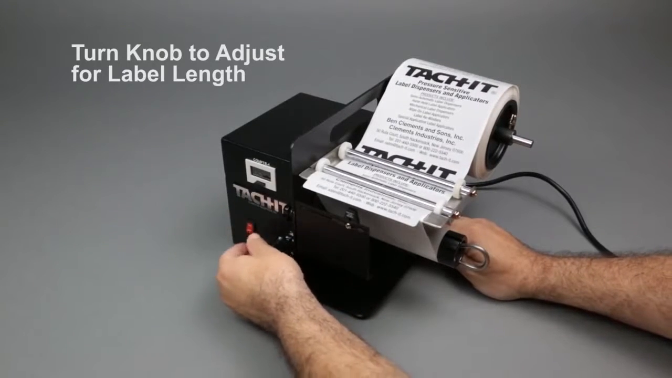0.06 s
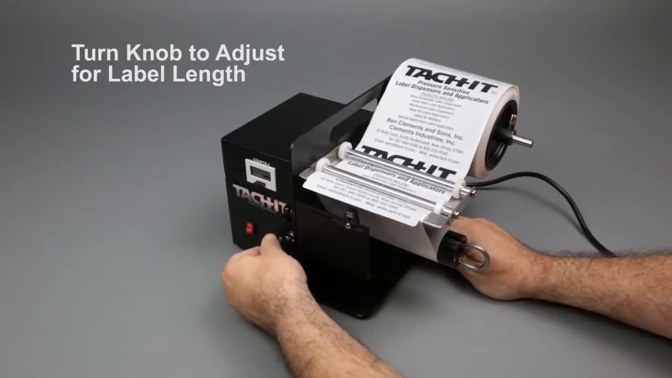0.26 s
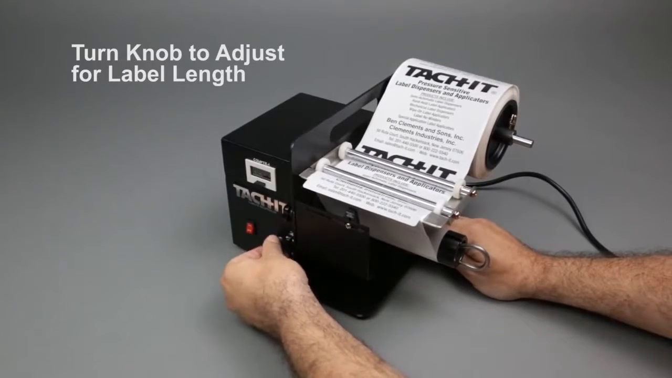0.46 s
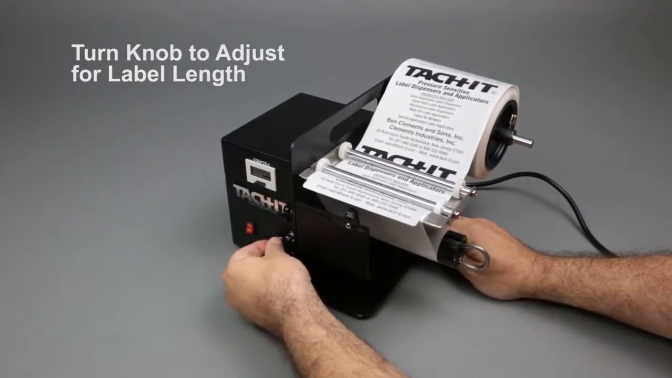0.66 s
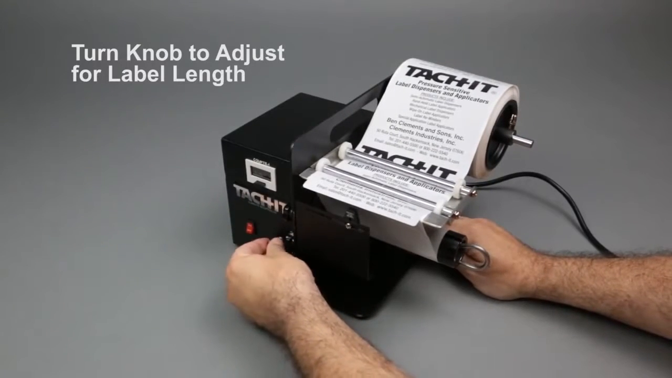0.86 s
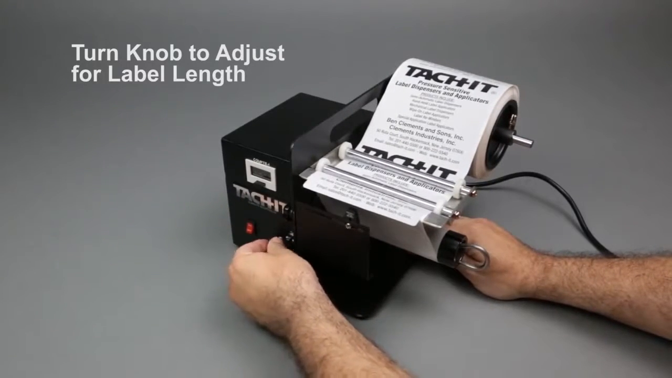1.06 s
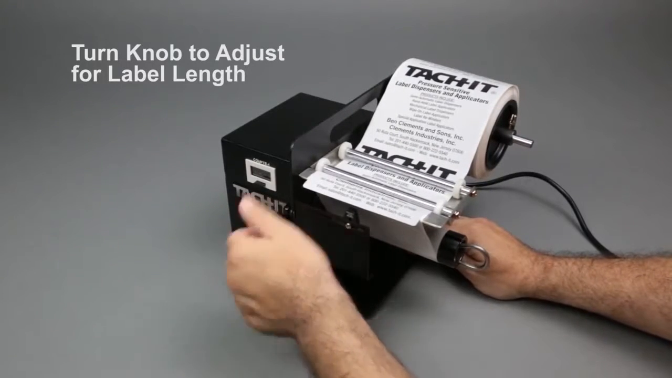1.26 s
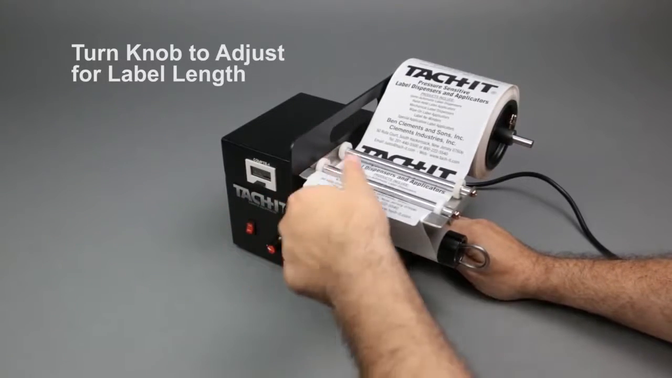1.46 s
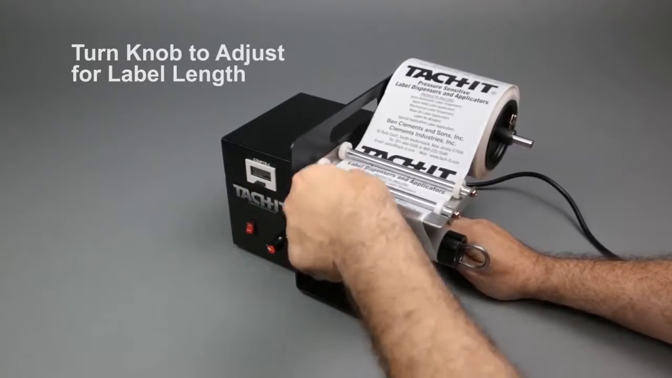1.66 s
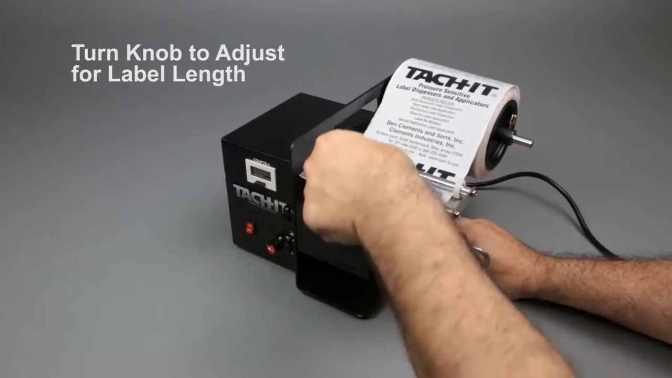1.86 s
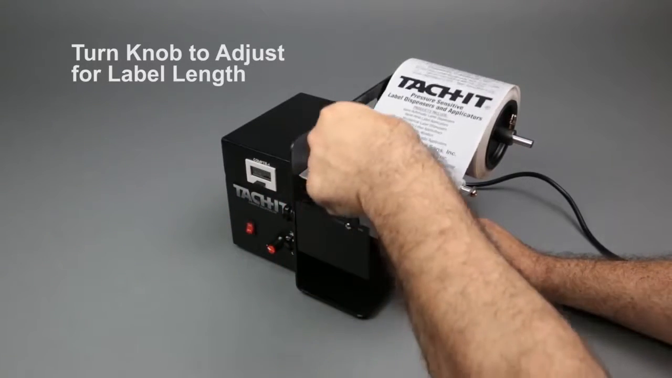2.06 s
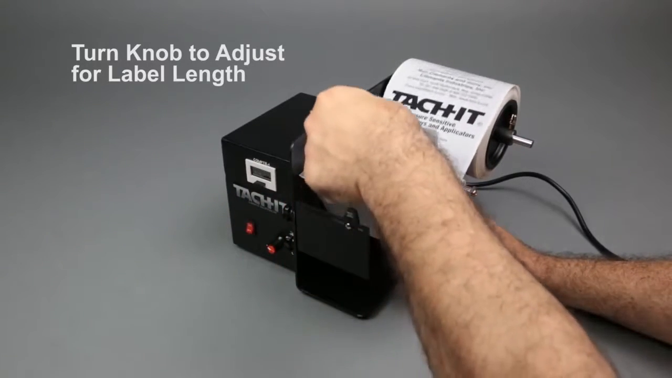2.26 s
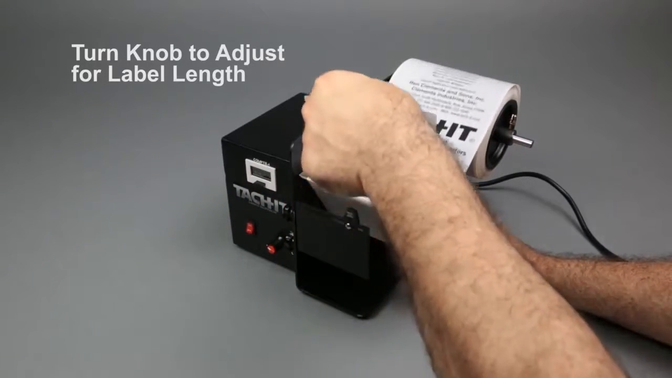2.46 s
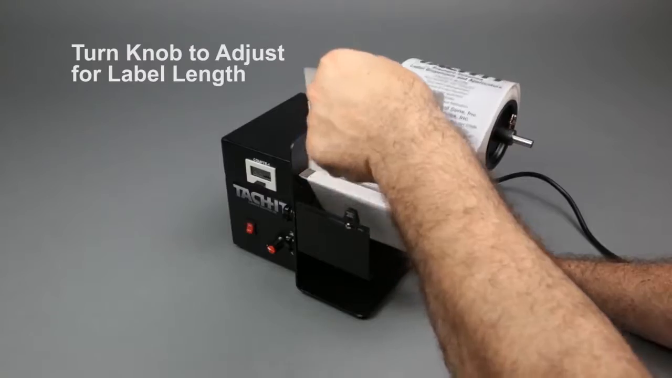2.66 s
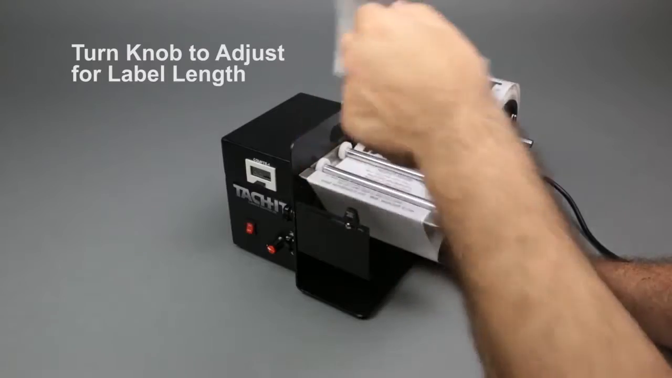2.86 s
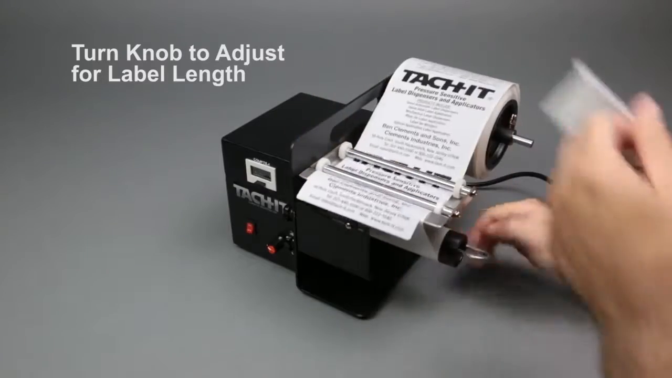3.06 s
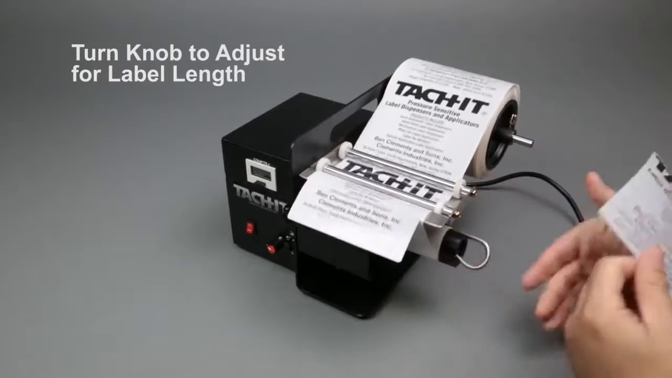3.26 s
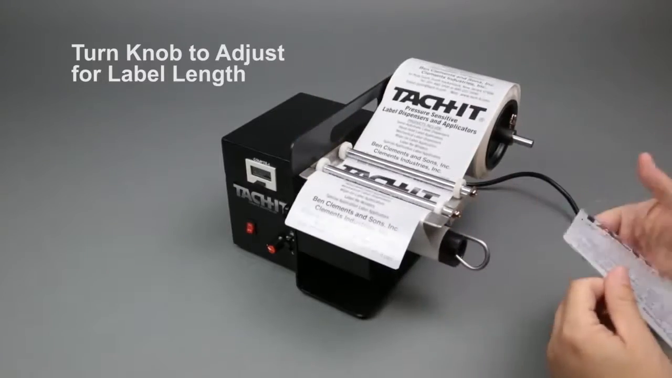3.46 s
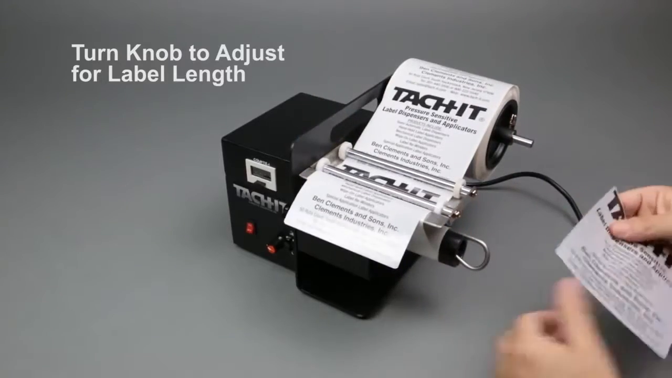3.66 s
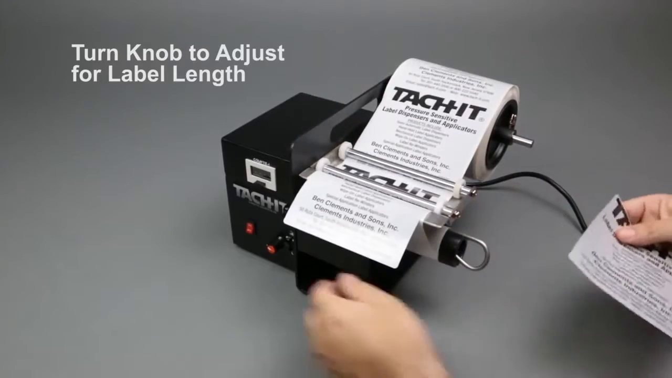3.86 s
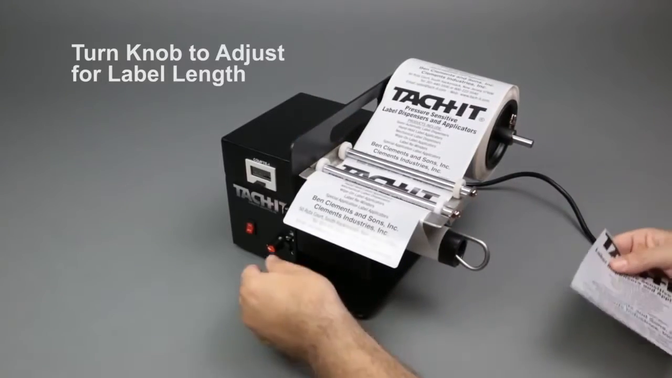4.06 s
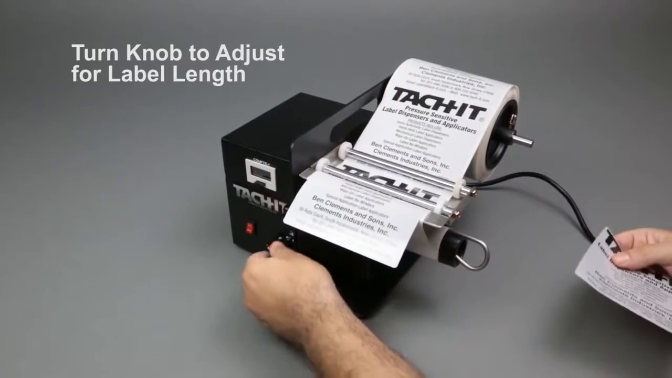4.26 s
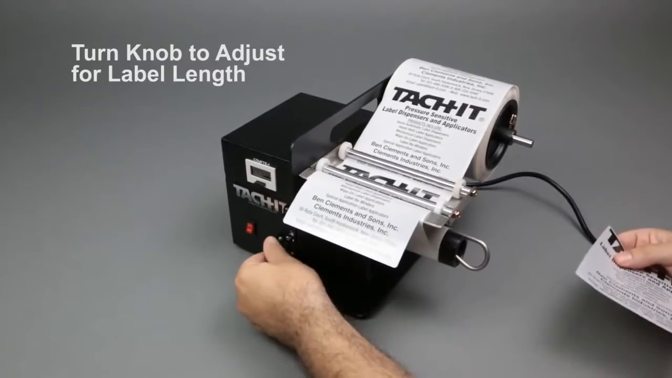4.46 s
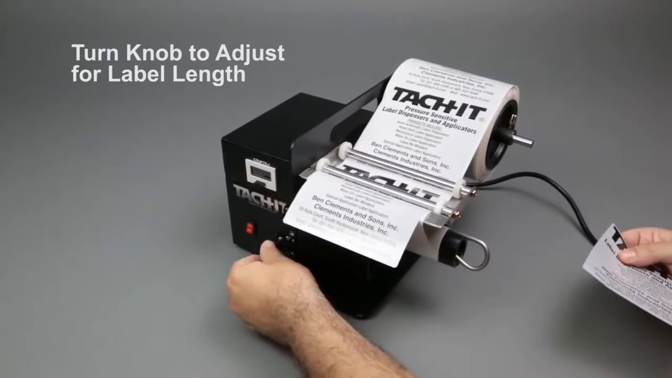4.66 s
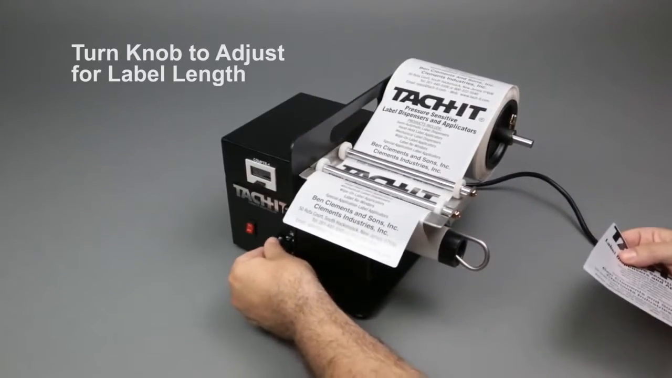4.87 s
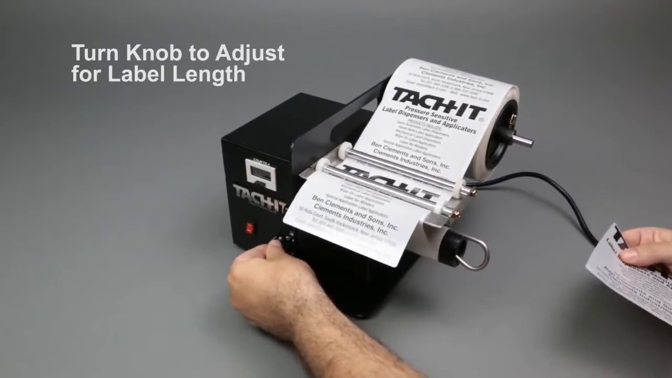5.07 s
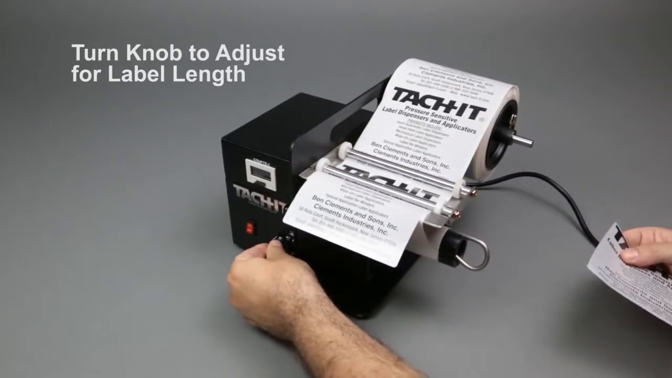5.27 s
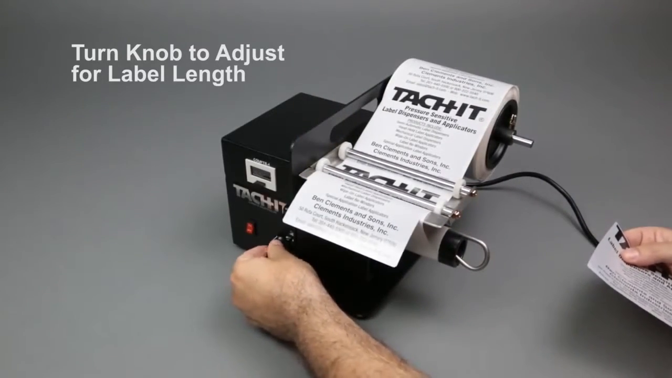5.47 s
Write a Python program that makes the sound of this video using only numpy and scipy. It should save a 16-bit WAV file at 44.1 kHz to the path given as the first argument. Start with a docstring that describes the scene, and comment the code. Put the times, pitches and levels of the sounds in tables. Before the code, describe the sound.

A small electric label dispenser is heard close up in a small quiet room, over a low steady rush of ventilation. At about 0.2 seconds a knob ticks lightly, with faint knocks from the metal housing. Around 1.5 seconds fingers brush very softly over paper. At 1.9 seconds a few clicks start the geared motor, which whirs and chatters while a label peels off its backing with a bright, sticky crackle. The peeling fades away between 2.8 and 3 seconds as the motor keeps running with a little more hum. The lifted label flips with a soft puff just after 3 seconds, and a sharp click comes at 3.2. At 3.4 seconds the motor brakes with a low knock and quickly winds down. The loose label crinkles twice around 3.7 seconds. Then only room air remains, with a light knob tick at about 5.1 seconds.

```python
"""Electric label dispenser, one feed

On a table in a small quiet room, close to the microphone, over a low rush of ventilation.
A knob ticks, fingers brush a label, and the geared mains motor feeds it, crackling off its backing,
until a hand lifts it away and it flips over with a puff. The motor brakes with a knock of the housing,
the loose label buckles twice, and the knob ticks again."""
import sys
import numpy as np
from scipy import signal
from scipy.fft import rfft, irfft, next_fast_len
from scipy.io import wavfile
from scipy.ndimage import uniform_filter1d

SR = 44100
rng = np.random.default_rng(int(sys.argv[2]) if len(sys.argv) > 2 else 0)


def unload_audio(sound):
    """Save the sound as a 16-bit wav file, at the path given as the first command line argument."""
    columns = np.transpose(np.atleast_2d(sound))
    # keep every value between -1 and 1, then stretch to whole-number steps
    steps = np.round(np.clip(columns, -1, 1) * 32767)
    wavfile.write(sys.argv[1], SR, steps.astype(np.int16))


N = 243873
TIME = np.arange(N) / SR

# gear teeth heard through the housing: frequency_hz, relative_db
GEAR_SPECTRUM = [(25, -52), (150, -27), (200, -2), (260, -7.5), (320, 0.5), (420, -2), (490, -6.5),
                 (620, -4.5), (850, -2.5), (1050, -8), (1250, -8), (1500, -7.5), (2200, -16.5), (4000, -28)]
# resonances of the steel housing: pitch_hz, width_hz, lift_db
HOUSING_RESONANCES = [(290.7, 11.2, 14), (406.6, 45, 8.5), (673, 36, 6), (854, 37, 3.5), (1360, 95, 3)]
# chatter of loose teeth and rollers: frequency_hz, relative_db
CHATTER_SPECTRUM = [(800, -13.5), (1500, -13), (2200, -7), (2700, -1.5), (3400, -3.5), (4300, -1.5),
                    (5500, -6), (6500, -8), (7700, -10.5), (8500, -17.5), (11000, -18.5), (12600, -24),
                    (15500, -30)]
# resonances of the gearbox and rollers: pitch_hz, width_hz, lift_db
ROLLER_RESONANCES = [(2590, 160, 4.5), (3220, 120, 4.5), (3730, 32, 0), (3724, 230, 10), (4240, 130, 0.5),
                     (4970, 140, 8.5), (6040, 140, 6.5), (6600, 90, 7.5), (7700, 150, 4), (9040, 250, 7)]
# the drive surges as the label is tugged and the backing springs slack:
# centre_s, length_s, gear_lift_db, hum_lift_db, chatter_lift_db
DRIVE_SURGES = [(2.272, 0.055, 1, 15, -2), (2.759, 0.048, 5, 7, 6), (3.08, .15, 0.5, 3.5, 3)]
# crackle of glue letting go: frequency_hz, relative_db
PEEL_SPECTRUM = [(40, -40), (300, -14), (800, -10), (1200, -11), (1650, -7.5), (2000, -1), (2500, -8),
                 (3200, -1), (4300, -1), (5500, 1), (7000, -1.5), (8300, -9), (11000, -13), (15500, -27)]
# resonances of the stripping plate: pitch_hz, width_hz, lift_db
PLATE_RESONANCES = [(1410, 110, 4.5), (3190, 150, 4), (4030, 27, 6), (4100, 25, -3), (4470, 200, 2),
                    (5060, 120, 5), (5500, 45, 3), (6200, 65, 2), (6820, 150, 3)]
# jolts of the housing: start_s, level_db, pitch_factor, rise_s, decay_factor
HOUSING_JOLTS = [(0.2335, -41, 1.004, .001, 0.78), (.279, -42, 1.01, 0.0037, 0.58),
                 (1.906, -44, 0.93, .003, 0.76), (3.385, -36, 1.04, 0.0033, 0.77),
                 (3.392, -29, 0.92, 0.0031, 0.47)]
# modes of the housing, scaled by each jolt: pitch_hz, relative_db, t60_s
HOUSING_MODES = [(390, -28, 0.081), (408.3, 0.5, 0.18), (443, -11, 0.16), (720, -27, .05),
                 (1165, -17.5, 0.12), (1500, -24, 0.17), (3590, -23.5, 0.16)]
# ticks of knob, switch and rollers: start_s, peak_db, pitch_hz, width_hz, t60_s
PART_TICKS = [(0.1556, -44.5, 3100, 3000, .008), (.188, -49, 3300, 3000, 0.011),
              (1.507, -61.5, 1670, 160, .25), (1.535, -54, 6000, 1800, .04), (1.66, -54, 3580, 1800, 0.04),
              (1.906, -42, 8600, 4500, 0.044), (1.921, -41, 8000, 4000, .04),
              (1.976, -29.5, 2170, 3500, 0.091), (3.2463, -27, 2300, 6010, 0.058),
              (5.145, -44.5, 3967, 1000, 0.032), (5.2, -55.5, 2700, 1400, .012)]
# ring of the loose label: frequency_hz, relative_db
LABEL_SPECTRUM = [(100, -37), (230, -13.5), (520, -6), (700, -9), (1070, -3.5), (1550, -10), (2100, -1),
                  (2700, -5.5), (3400, -8.5), (4800, -12.5), (6500, -21), (7400, -17), (9000, -31.5),
                  (12000, -38), (15000, -54)]
# the label buckles and springs back: start_s, level_db, shiver_s, tilt_db_per_octave
LABEL_BUCKLES = [(3.654, -44, .028, -3), (3.733, -45, 0.015, -1.5)]
# the sharpest creases snapping through: start_s, level_db, t60_s, tilt_db_per_octave
CREASE_SNAPS = [(3.6545, -34.5, 0.035, -0.5), (3.6646, -36.5, 0.022, -0.5), (3.674, -35, 0.031, -0.5),
                (3.726, -50.5, .04, 13), (3.7345, -39.5, 0.028, -1), (3.7376, -34, 0.0062, 7.5),
                (3.7495, -41, .03, 1.5)]
# fingers sliding on paper: centre_s, length_s, level_db
FINGER_STROKES = [(1.534, 0.025, -63.5), (1.731, 0.048, -65), (1.873, 0.092, -65.5)]
# steady air in the room: frequency_hz, relative_db
AIR_SPECTRUM = [(20, -21), (55, -10), (87, -6.5), (120, -3), (150, -7.5), (190, 0), (300, -5), (400, -10),
                (850, -15), (1300, -20.5), (2400, -25.5), (4000, -31), (8000, -35.5), (15500, -42)]
# self-noise of each input channel: frequency_hz, relative_db
HISS_SPECTRUM = [(12, -29), (20, 5), (112, -3), (252, -12.5), (452, -7.5), (1630, -10), (15500, -5.5)]

# one feed: the motor spins up, runs, and slows to rest after the brake
START_S, SPIN_UP_S, BRAKE_S, COAST_S = 1.903, 0.03, 3.382, 0.12
# the label peels at full width, then narrows to its last corner as the hand lifts it away
PEEL_S, PEEL_RISE_S, LIFT_S, FREE_S, LET_GO_S = 1.918, 0.034, 2.78, 2.92, 0.048
# the backing draws taut, and gears and peeling grow louder
TAUT_S, TAUT_RISE_S = 2.04, 0.036
GEAR_DB, TAUT_GEAR_DB, PEEL_DB, TAUT_PEEL_DB = -50, 3, -42, 1.5
# the drive roller runs out of round and loads the gears once a turn
TURN_HZ, HEAVIEST_S, TURN_DB = 6.86, 2.245, 1.5
# loose teeth and rollers chatter less while the label drags on them
CHATTER_DB, DAMPED_CHATTER_DB = -45.5, -4
# the stator hum, and how it grows from the moment the label is lifted
HUM_HZ, HUM_DB, LIFTED_HUM_DB, HUM_RISE_S = 120, -68, 8, 0.04


def motor(torque_ripple=0.11, wobble_db=1.36):
    """Gear teeth knock and chatter, harder at each torque pulse of the mains; the stator hums."""
    phase = 2 * np.pi * HUM_HZ * TIME
    torque = (1 + torque_ripple * np.cos(phase)) * undb(wobble_db * wander(35))
    tooth_hits = impacts(per_s=1800, scatter_db=2.5) * torque
    gears = unit(colour(tooth_hits, GEAR_SPECTRUM, HOUSING_RESONANCES))
    loose_hits = impacts(per_s=7000, scatter_db=1.5) * torque
    chatter = unit(colour(loose_hits, CHATTER_SPECTRUM, ROLLER_RESONANCES))
    hum = np.sqrt(2) * np.sin(phase) * undb(3.2 * wander(22.03))
    tension = adhesion() * ramp(TAUT_S, TAUT_RISE_S)
    roller_load = np.cos(2 * np.pi * TURN_HZ * (TIME - HEAVIEST_S))
    gear_db = GEAR_DB + TAUT_GEAR_DB * tension + TURN_DB * roller_load
    chatter_db = CHATTER_DB + DAMPED_CHATTER_DB * adhesion()
    hum_db = HUM_DB + LIFTED_HUM_DB * ramp(LIFT_S, HUM_RISE_S)
    for centre_s, length_s, gear_lift_db, hum_lift_db, chatter_lift_db in DRIVE_SURGES:
        surge = swell(centre_s, length_s)
        gear_db += gear_lift_db * surge
        hum_db += hum_lift_db * surge
        chatter_db += chatter_lift_db * surge
    return running() * (gears * undb(gear_db) + chatter * undb(chatter_db) + hum * undb(hum_db))


def running():
    """Gain of the drive: spin up, hold, then fall with the square of its speed."""
    return ramp(START_S, SPIN_UP_S) * (1 - ramp(BRAKE_S, COAST_S)) ** 2


def peeling(grip_db=0.7, contact_shift=0.23):
    """Threads of glue snap by the thousand as the backing bends over the stripping plate."""
    snaps = impacts(per_s=9000, scatter_db=2.5) * undb(grip_db * wander(60))
    # the line of contact wanders, so each resonance of the plate is driven now more, now less
    shifting = sum(wander(32) * resonate(snaps, hz, 3 * width_hz) for hz, width_hz, _ in PLATE_RESONANCES)
    crackle = unit(colour(snaps + contact_shift * shifting, PEEL_SPECTRUM, PLATE_RESONANCES))
    return crackle * undb(PEEL_DB + TAUT_PEEL_DB * ramp(TAUT_S, TAUT_RISE_S)) * adhesion()


def adhesion(narrowing_db_per_s=26):
    """Share of the label's width that is being pulled off the backing."""
    narrowing = undb(-narrowing_db_per_s * np.maximum(TIME - LIFT_S, 0))
    return ramp(PEEL_S, PEEL_RISE_S) * narrowing * (1 - ramp(FREE_S, LET_GO_S))


def knocks():
    """The housing rings low when the knob is turned and when the motor starts and brakes."""
    out = np.zeros(N)
    for start_s, level_db, pitch_factor, rise_s, decay_factor in HOUSING_JOLTS:
        for hz, mode_db, t60_s in HOUSING_MODES:
            decay = fade(t60_s * decay_factor)
            age_s = TIME[:len(decay)]
            attack = 1 - np.exp(-age_s / rise_s)
            tone = np.sin(2 * np.pi * hz * pitch_factor * age_s)
            add(out, start_s, undb(level_db + mode_db) * decay * attack * tone)
    return out


def ticks(rattle=0.36):
    """A hard contact and a short rattle excite one resonance of a small part."""
    out = np.zeros(N)
    for start_s, peak_db, hz, width_hz, t60_s in PART_TICKS:
        decay = fade(t60_s)
        push = rattle * decay * rng.standard_normal(len(decay))
        push[0] = 2  # the hard contact
        tick = resonate(resonate(push, hz, width_hz), hz, width_hz)
        add(out, start_s, undb(peak_db) * tick / np.abs(tick).max())
    return out


def buckling(give_s=0.0054, t60_s=0.083):
    """The loose label gives way, shivers while it folds through, and settles."""
    out = np.zeros(N)
    for start_s, level_db, shiver_s, tilt_db in LABEL_BUCKLES:
        giving = np.exp(np.minimum(TIME - start_s, 0) / give_s)
        settling = np.exp(-np.log(1000) * np.maximum(TIME - start_s - shiver_s, 0) / t60_s)
        envelope = giving * settling
        out += undb(level_db) * label_ring(envelope * rng.standard_normal(N), envelope, tilt_db)
    return out


def creasing(snap=2.8, give_s=0.0014, lead_s=0.01):
    """Each crease gives way, snaps and sets the label shivering for a few milliseconds."""
    out = np.zeros(N)
    for start_s, level_db, t60_s, tilt_db in CREASE_SNAPS:
        giving = np.exp((TIME[:int(lead_s * SR)] - lead_s) / give_s)
        envelope = np.concatenate([giving, fade(t60_s)])
        shiver = envelope * rng.standard_normal(len(envelope))
        shiver[len(giving)] = snap
        add(out, start_s - lead_s, undb(level_db) * label_ring(shiver, envelope, tilt_db))
    return out


def label_ring(push, envelope, tilt_db):
    """The loose label rings to a push, with the energy of the given envelope."""
    ring = colour(push, LABEL_SPECTRUM, tilt_db=tilt_db)
    return ring * np.sqrt(np.sum(envelope ** 2) / np.sum(ring ** 2))


def flap(start_s=3.0575, gain_db=-23, pitch_hz=340, t60_s=0.0077, band_hz=(130, 1100)):
    """The lifted label flips over and pushes one soft puff of air."""
    out = np.zeros(N)
    swing = fade(t60_s)
    puff = swing * np.cos(2 * np.pi * pitch_hz * TIME[:len(swing)])
    soften = signal.butter(2, band_hz, "band", fs=SR, output="sos")
    add(out, start_s, undb(gain_db) * signal.sosfilt(soften, puff))
    return out


def brushing():
    """Skin catches and slips on the label in short soft strokes."""
    strokes = sum(undb(db) * swell(centre_s, length_s) for centre_s, length_s, db in FINGER_STROKES)
    slips = impacts(per_s=3400, scatter_db=0.5)
    return strokes * unit(resonate(slips, hz=4000, width_hz=3600))


def room(direct, wet_db=-9, t60_s=0.23, gap_s=0.0054):
    """The near walls return a short diffuse tail, thin in the bass, just behind the direct sound."""
    decay = fade(t60_s)
    tail = decay * rng.standard_normal(len(decay)) * (TIME[:len(decay)] > gap_s)
    tail = colour(tail, [(150, -13), (500, -3.5), (1200, 1.5), (3000, -1.5), (7000, -2.5), (15000, 0)])
    tail /= np.sqrt(np.sum(tail ** 2))
    return direct + undb(wet_db) * signal.fftconvolve(direct, tail)[:N]


def ventilation(level_db=-61.5, drift_db=0.5):
    """Room tone: a low steady rush of air."""
    return unit(colour(rng.standard_normal(N), AIR_SPECTRUM)) * undb(level_db + drift_db * wander(12))


def impacts(per_s, scatter_db):
    """A random train of tiny impacts of uneven size."""
    struck = rng.random(N) < per_s / SR
    return unit(struck * rng.choice([-1, 1], N) * undb(scatter_db * rng.standard_normal(N)))


def wander(rate_hz):
    """Smooth random drift of rms 1."""
    hold = int(SR / rate_hz)
    steps = np.repeat(rng.standard_normal(N // hold + 1), hold)[:N]
    return unit(uniform_filter1d(steps, hold))


def colour(x, spectrum, resonances=(), tilt_db=0):
    """Causal filter from a spectrum, with resonances on top and a tilt per octave."""
    size = 2 * next_fast_len(len(x))
    hz = np.maximum(np.fft.rfftfreq(size, 1 / SR), 1)
    point_hz, point_db = np.transpose(spectrum)
    db = np.interp(np.log(hz), np.log(point_hz), point_db) + tilt_db * np.log2(hz)
    for pitch_hz, width_hz, lift_db in resonances:
        db += lift_db / (1 + (2 * (hz - pitch_hz) / width_hz) ** 2)
    # minimum phase: nothing rings before it is struck
    cepstrum = irfft(db * np.log(10) / 20)
    cepstrum[1:size // 2] *= 2
    cepstrum[size // 2 + 1:] = 0
    return irfft(rfft(x, size) * np.exp(rfft(cepstrum)))[:len(x)]


def resonate(x, hz, width_hz):
    """One resonance, gain 1 at its centre."""
    return signal.lfilter(*signal.iirpeak(hz, hz / width_hz, fs=SR), x)


def fade(t60_s, size=16384):
    """Exponential decay."""
    return np.exp(-np.log(1000) * TIME[:size] / t60_s)


def ramp(start_s, length_s):
    """Rise from 0 to 1 and hold."""
    return np.clip((TIME - start_s) / length_s, 0, 1)


def swell(centre_s, length_s):
    """A smooth bump of height 1."""
    return np.exp(-2 * ((TIME - centre_s) / length_s) ** 2)


def add(track, start_s, sound):
    """Mix a sound in at a time."""
    start = int(start_s * SR)
    track[start:start + len(sound)] += sound[:N - start]


def undb(db):
    """Decibels to gain."""
    return 10 ** (np.asarray(db) / 20)


def unit(x):
    """Scale to rms 1."""
    return x / np.sqrt(np.mean(x ** 2))


def scene():
    """Machine and paper close up, over the room tone, the same in both channels."""
    direct = motor() + peeling() + ticks() + buckling() + creasing() + brushing()
    at_microphone = room(direct) + knocks() + flap() + ventilation()
    return np.array([at_microphone, at_microphone])


def record(dry, hiss_db=-69.5, top_hz=15650):
    """Each input channel adds faint hiss of its own; the top is cut steeply."""
    hiss = np.array([unit(colour(rng.standard_normal(N), HISS_SPECTRUM)) for _ in dry])
    high_cut = signal.ellip(12, 0.1, 70, top_hz, fs=SR, output="sos")
    return signal.sosfilt(high_cut, dry + undb(hiss_db) * hiss)


dry = scene()
out = record(dry)
unload_audio(out)
```